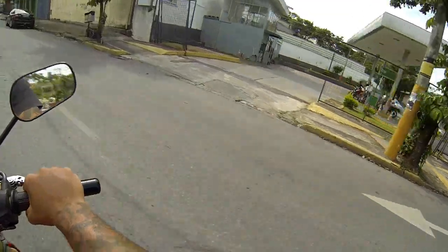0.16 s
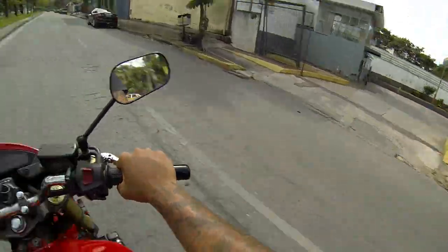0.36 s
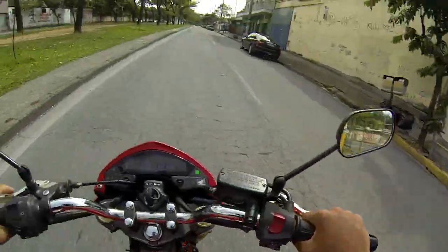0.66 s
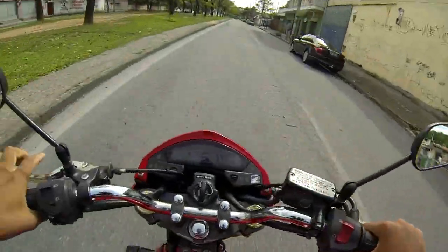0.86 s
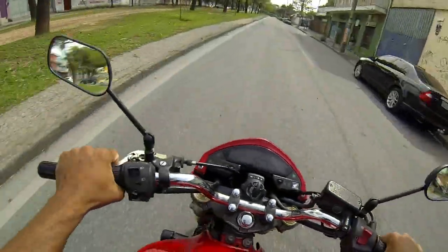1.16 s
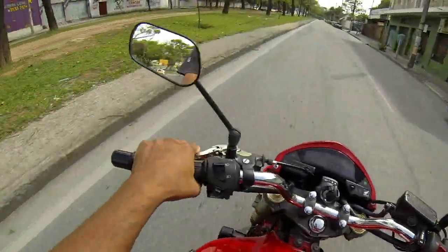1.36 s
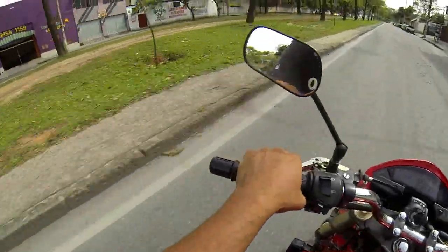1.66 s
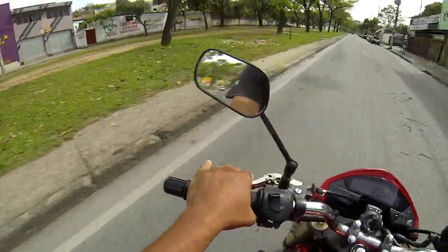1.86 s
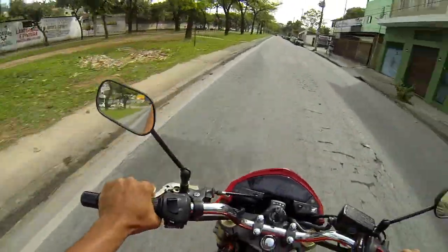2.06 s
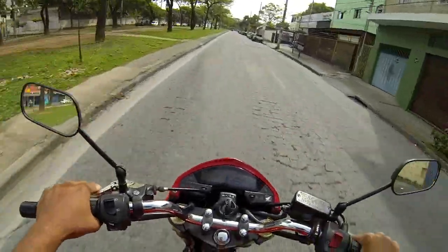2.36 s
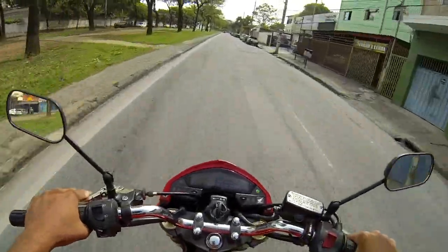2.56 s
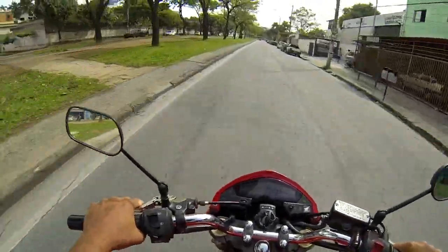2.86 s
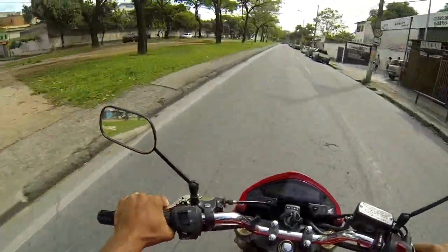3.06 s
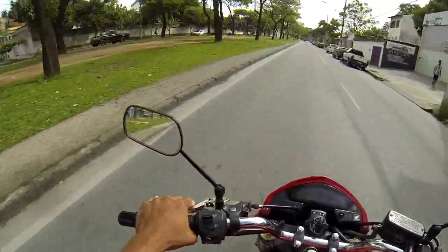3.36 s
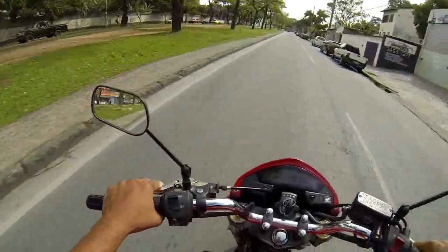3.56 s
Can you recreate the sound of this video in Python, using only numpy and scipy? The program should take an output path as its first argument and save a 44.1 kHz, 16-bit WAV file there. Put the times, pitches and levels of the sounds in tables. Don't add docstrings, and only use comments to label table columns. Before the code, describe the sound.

Close onboard motorcycle engine with a round, throaty exhaust drone accelerates, drops in pitch at each of three quick gear changes and pulls again; rumbling wind, faint chain whine and small clicks, brighter on the right.

```python
import sys
import numpy as np
from scipy import signal
from scipy.fft import rfft, irfft, next_fast_len
from scipy.io import wavfile
from scipy.ndimage import uniform_filter1d, map_coordinates

SR = 44100
rng = np.random.default_rng(int(sys.argv[2]) if len(sys.argv) > 2 else 0)


def log_audio(samples):
    frames = np.atleast_2d(samples).T
    limited = np.clip(frames, -1, 1)
    pcm = np.round(limited * 32767).astype(np.int16)
    wavfile.write(sys.argv[1], SR, pcm)


def volts_from_decibels(level):
    exponent = np.asarray(level, float) / 20
    return 10 ** exponent


N = 163170

# (throttle shuts [s], opens [s], even puffs [dB], alternate puffs [dB], one cylinder [dB])
SHIFTS = [
    (0.979, 1.194, -7.5, -7, -13.5),
    (1.948, 2.103, -9, -9.5, -13),
    (3.079, 3.271, -8.5, -19.5, -16.5),
]


def unit(x):
    return x / np.sqrt(np.mean(x ** 2) + 1e-20)


def spectrum_gain(points, hz):
    f, db = np.transpose(points)
    return volts_from_decibels(np.interp(np.log(hz + 1), np.log(f + 1), db, left=-120, right=-120))


def curve(rows):
    return np.interp(np.arange(N) / SR, *np.transpose(rows))


def wobble(rate_hz):
    return map_coordinates(rng.standard_normal(N // 100), [np.arange(N) * rate_hz / SR])


def swells(rows):
    t = np.arange(N) / SR
    return sum(db * np.exp(-(2 * (t - mid) / length) ** 4) for mid, length, db in rows)


def filtered(x, response):
    m = next_fast_len(N + 8192)
    return irfft(rfft(x, m) * response(np.fft.rfftfreq(m, 1 / SR)), m)[:N]


def resonance(hz, centre_hz, width_hz):
    return 1 / (1 + 1j * (hz * hz - centre_hz ** 2) / (width_hz * (hz + 1)))


def pulses(at, size):
    k = np.floor(at)[:, None] + np.arange(-8, 9)
    offset = k - at[:, None]
    w = np.sinc(offset) * np.cos(np.pi * offset / 18) ** 2
    index = np.clip(k, 0, N).astype(int)
    return np.bincount(index.ravel(), (w * size[:, None]).ravel(), N + 1)[:N]


def shut(row):
    shut_s, open_s = .035, .018
    t = np.arange(N) / SR
    closing = np.clip((t - row[0]) / shut_s + .5, 0, 1)
    return closing * np.clip((row[1] - t) / open_s + .5, 0, 1)


def firing_rate():
    # (time [s], crank speed [turns/s])
    crank = [(0, 91.1), (.42, 106.4), (.85, 121.2), (.955, 124.3), (1.175, 95.3), (1.215, 102),
             (1.245, 100.5), (1.315, 89.8), (1.84, 99.4), (1.945, 99.6), (2.095, 84.5), (2.14, 94.5),
             (2.22, 81.2), (3.06, 90), (3.265, 72), (3.322, 89.5), (3.37, 77.3), (3.7, 80.4)]
    return 2 * uniform_filter1d(curve(crank), size=900, mode='nearest')


def firing_pulses(rate, fired, closed):
    pair_share, cylinder_share, scatter, jitter = .1, .03, .03, .003
    burble_scatter, burble_jitter = .27, .02
    n = np.arange(1, int(fired[-1]))
    luck = rng.standard_normal((N // 100, 4))[:len(n)]
    at = np.interp(n, fired, np.arange(N))
    i = at.astype(int)
    gap = SR / rate[i]
    pair = (-1.) ** n
    one = (n % 4 == 0) * 2 - .5
    blow = (1 - closed[i]) * (1 + pair_share * pair + cylinder_share * one + scatter * luck[:, 0])
    puff = sum(shut(r)[i] * (volts_from_decibels(r[3]) * pair + volts_from_decibels(r[4]) * one - volts_from_decibels(r[2])) for r in SHIFTS)
    puff = puff * (1 + burble_scatter * luck[:, 1])
    sharp = pulses(at + jitter * gap * luck[:, 2], blow * gap / 2)
    puffs = pulses(at + burble_jitter * gap * luck[:, 3], puff * gap / 2)
    return sharp + filtered(puffs, lambda hz: resonance(hz, 300, 380))


def pipe(hz):
    # (frequency [Hz], width [Hz], level [dB])
    modes = [(179, 68, -23), (233.3, 59, -18), (324.1, 80.6, -13.5), (435.2, 100, -22.5), (618, 159, -39),
             (749.6, 27, -41.5), (965, 119, -43.5), (1146, 140, -54), (1266.6, 119, -49.5),
             (1478, 135, -55), (1881, 110, -61), (2470, 510, -65.5), (2997, 190, -63), (3600, 117, -64)]
    lag_rad = 1.1
    ring = [volts_from_decibels(db / 2) * resonance(hz, centre_hz, width_hz) for centre_hz, width_hz, db in modes]
    low = np.sqrt(sum(np.abs(r) ** 4 for r in ring[:4]))
    return low * np.exp(-1j * lag_rad), sum(r * r for r in ring[4:])


def gas_rush(fired, closed):
    # (frequency [Hz], density [dB per Hz])
    rush_spectrum = [(250, 17), (700, 10.5), (1350, 3.5), (2200, -13.5), (3800, -10.5), (4700, -22.5),
                     (6500, -33.5), (13000, -69)]
    level_db, shut_db, gate_depth = -43, -2, .3
    gate = 1 + gate_depth * (1 - closed) * np.cos(2 * np.pi * fired)
    noise = gate * rng.standard_normal(N)
    rush = unit(filtered(noise, lambda hz: spectrum_gain(rush_spectrum, hz)))
    return volts_from_decibels(level_db + shut_db * closed + wobble(23)) * rush


def engine():
    # (middle [s], length [s], level [dB])
    walls = [
        (.22, .65, 3),
        (.8, .35, 4.5),
        (1.39, .17, -5),
        (1.66, .4, 4.5),
        (2.16, .13, 2),
        (2.75, .2, 2),
    ]
    rate = firing_rate()
    fired = np.cumsum(rate) / SR
    closed = sum(shut(row) for row in SHIFTS)
    drive = firing_pulses(rate, fired, closed)
    push, ring = (filtered(drive, lambda hz: pipe(hz)[k]) for k in range(2))
    echo_db = swells(walls)
    return volts_from_decibels(echo_db) * gas_rush(fired, closed) - volts_from_decibels(.52 * echo_db + wobble(3.6)) * ring - push


def chain():
    centre_hz, width_hz, start_db, rise_db_per_s = 2120, 260, -68, 2.7
    whine = filtered(rng.standard_normal(N), lambda hz: 1 / (1 + ((hz - centre_hz) / width_hz) ** 4))
    return volts_from_decibels(start_db + rise_db_per_s * np.arange(N) / SR) * unit(whine)


def wind():
    # (frequency [Hz], density [dB per Hz])
    buffet = [(15, 7), (40, 2.5), (80, 3.5), (130, -1.5), (250, -9), (600, -23), (1200, -52)]
    # (middle [s], length [s], level [dB])
    gusts = [
        (1.0, 0.12, 1.5),
        (1.4, 0.22, 0),
        (1.85, 0.46, 5),
        (2.06, 0.16, 6.5),
        (2.28, 0.059, -5),
        (2.72, 0.31, 7),
        (3.2, 0.61, 4),
        (3.5, 0.84, 5),
    ]
    level_db, lump_db = -34, 2
    low = unit(filtered(rng.standard_normal(N), lambda hz: spectrum_gain(buffet, hz)))
    return volts_from_decibels(level_db + lump_db * wobble(12) + swells(gusts)) * low


def scene():
    return np.tile(engine() + chain() + wind(), (2, 1))


def ride_gain(lifted):
    # (time [s], left over right [dB])
    ride = [(0.0, -5.5), (0.17, -9.5), (0.38, -12.5), (0.61, -5.5), (0.94, -9), (1.05, -11), (1.15, -14),
            (1.33, -4), (1.84, -5.5), (2.07, -14), (2.18, 0), (2.67, -1.5), (2.71, -5.5), (2.98, -5.0),
            (3.19, -13), (3.25, -13.5), (3.32, 3.5), (3.7, -1.5)]
    # (time [s], peak [dB])
    clicks = [
        (.783, -24),
        (.787, -31),
        (1.198, -30),
        (1.534, -30),
        (1.69, -33),
        (2.115, -28),
        (2.78, -35),
        (3.285, -25),
    ]
    ride_db, step_db, dither_db, click_hz = 9, .1, .12, 3000
    ceiling, knee = 1.1, 4
    gain_db = step_db * np.round((ride_db - curve(ride) + dither_db * wobble(30)) / step_db)
    s, db = np.transpose(clicks)
    ticks = filtered(pulses(s * SR, volts_from_decibels(db)), lambda hz: 1j * hz / (click_hz + 1j * hz))
    right = lifted * volts_from_decibels(gain_db) + ticks
    return right / (1 + np.abs(right / ceiling) ** knee) ** (1 / knee)


def roll_off(x):
    return signal.sosfilt(signal.butter(12, 15000, fs=SR, output="sos"), x)


def record(dry):
    hiss_db = [-64.5, -77]
    dc_offset = [.1917, .009]
    lift_lo_hz, lift_hi_hz = 45.4, 864
    hiss = volts_from_decibels(np.array(hiss_db))[:, None] * rng.standard_normal((2, N))
    lifted = filtered(dry[1], lambda hz: (lift_lo_hz + 1j * hz) / (lift_hi_hz + 1j * hz))
    right = ride_gain(lifted + hiss[1])
    return roll_off(np.array([dry[0] + hiss[0], right]) + np.array(dc_offset)[:, None])


dry = scene()
out = record(dry)
log_audio(out)
```